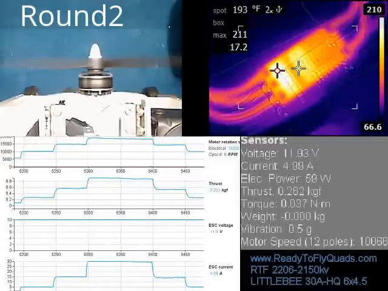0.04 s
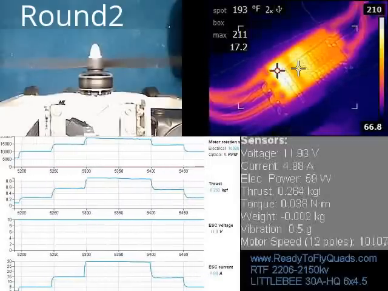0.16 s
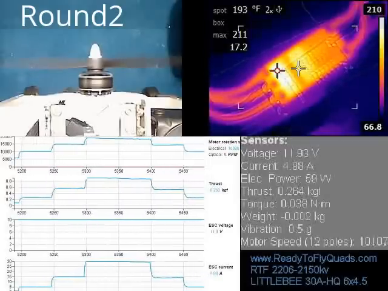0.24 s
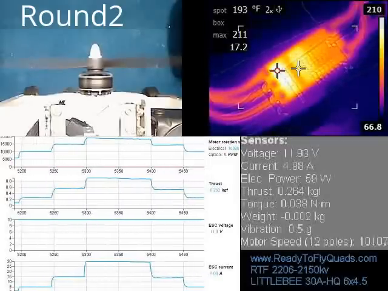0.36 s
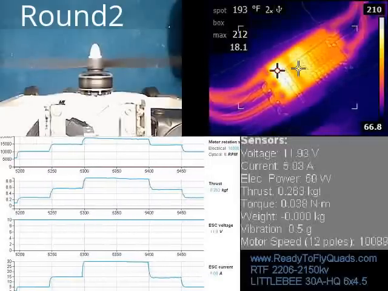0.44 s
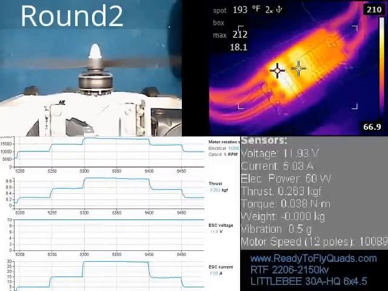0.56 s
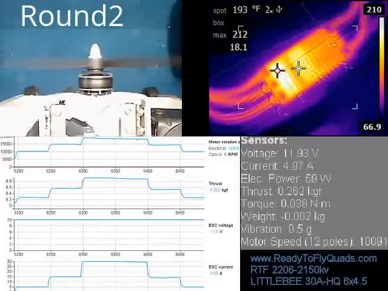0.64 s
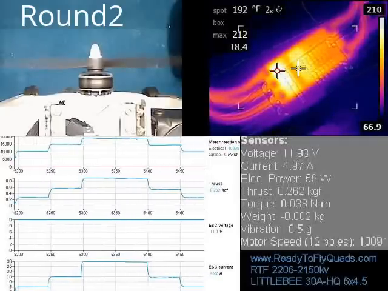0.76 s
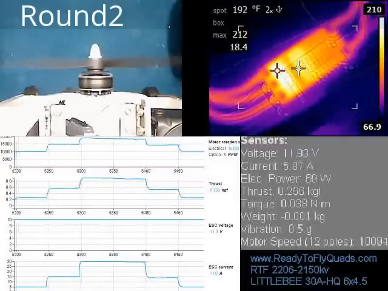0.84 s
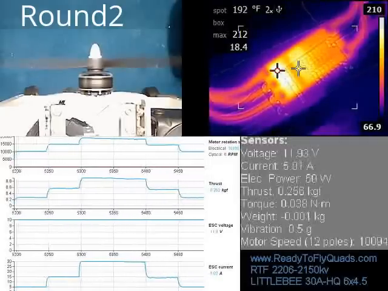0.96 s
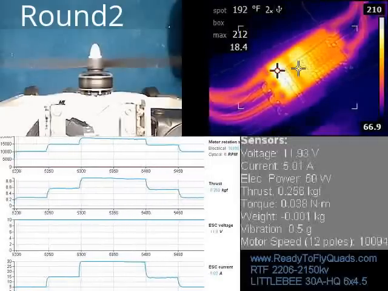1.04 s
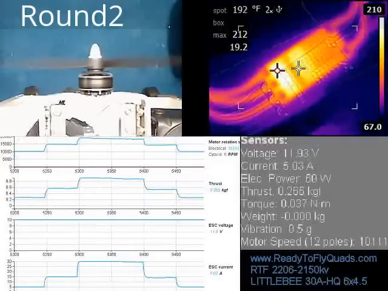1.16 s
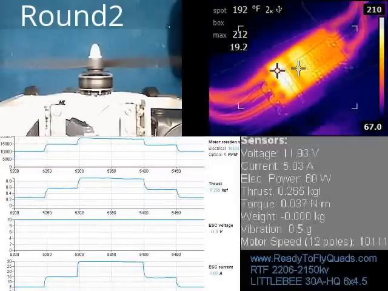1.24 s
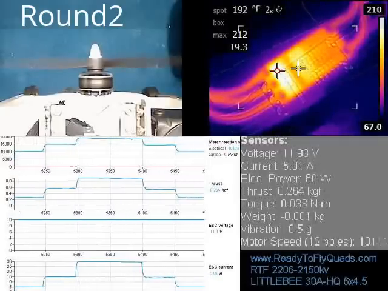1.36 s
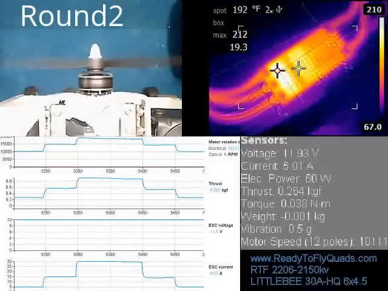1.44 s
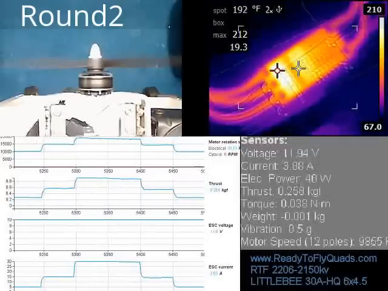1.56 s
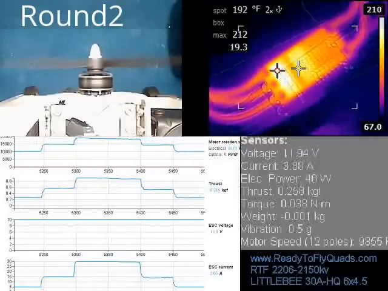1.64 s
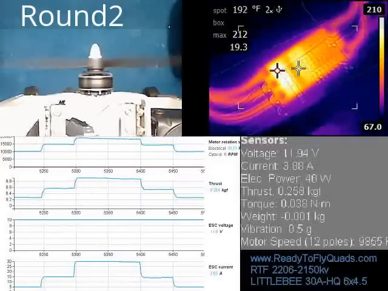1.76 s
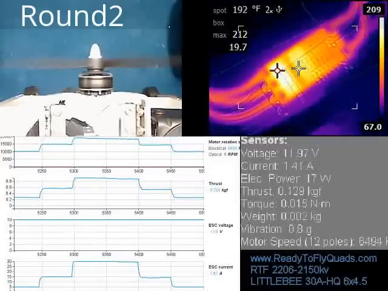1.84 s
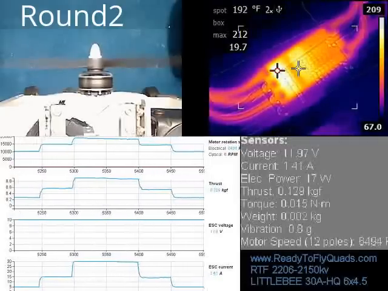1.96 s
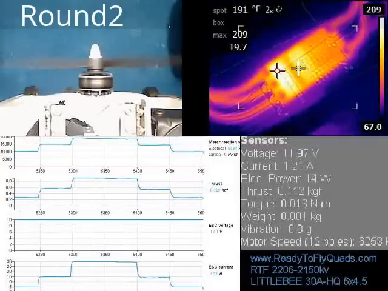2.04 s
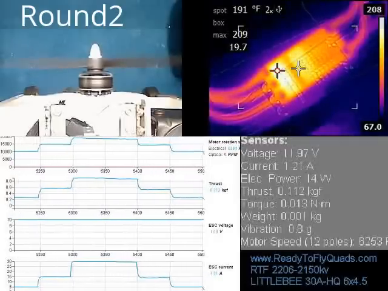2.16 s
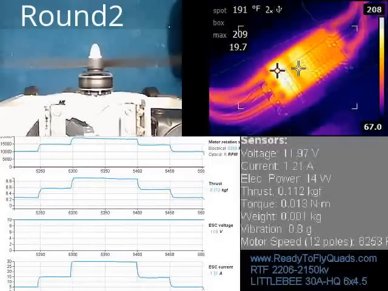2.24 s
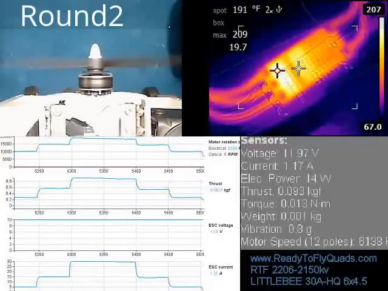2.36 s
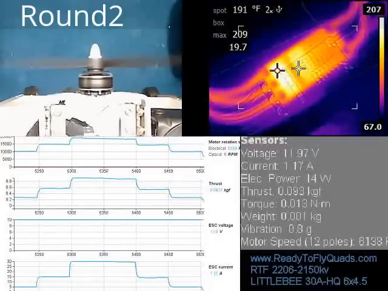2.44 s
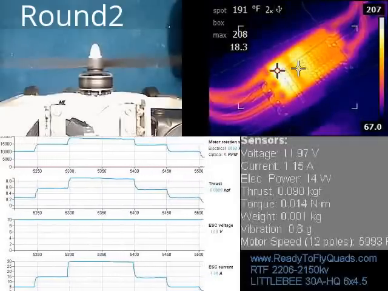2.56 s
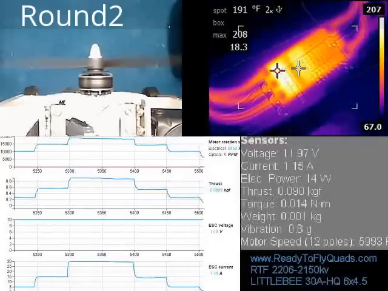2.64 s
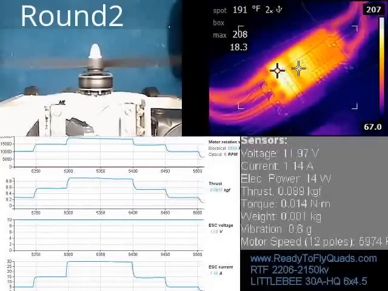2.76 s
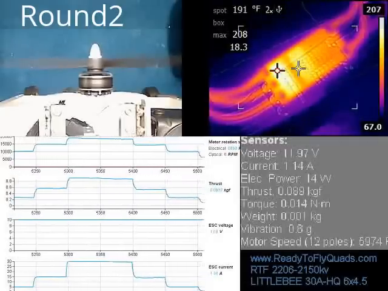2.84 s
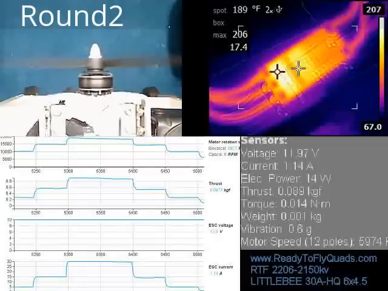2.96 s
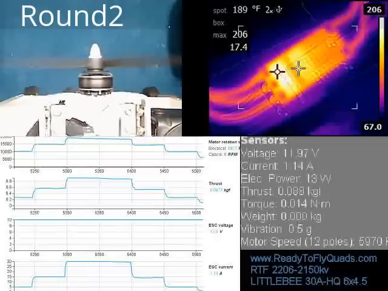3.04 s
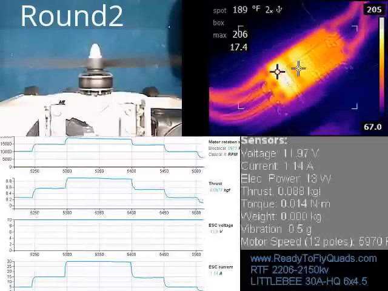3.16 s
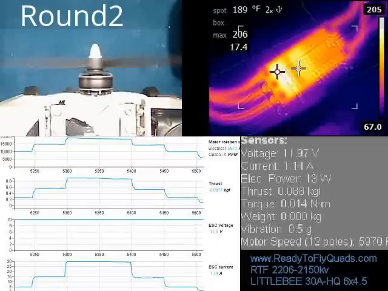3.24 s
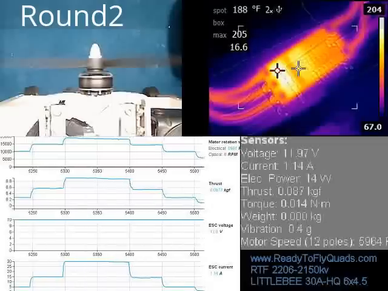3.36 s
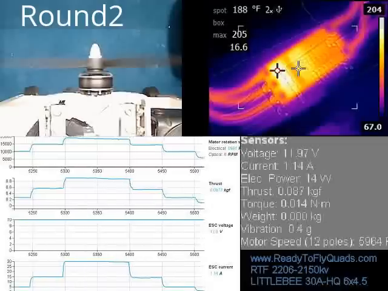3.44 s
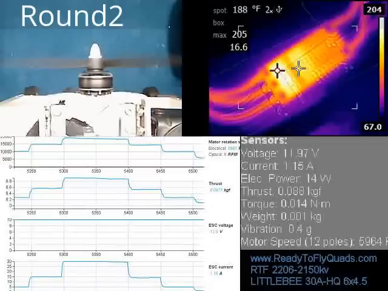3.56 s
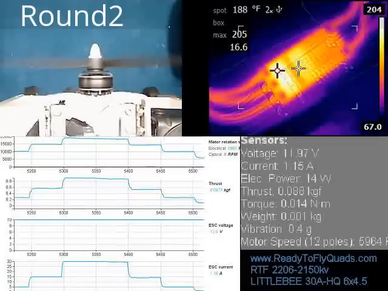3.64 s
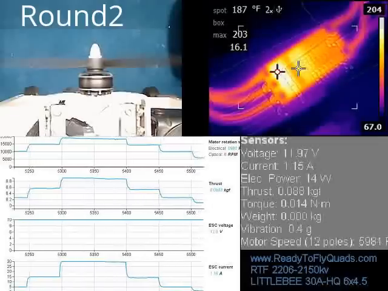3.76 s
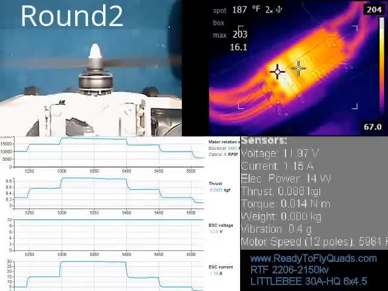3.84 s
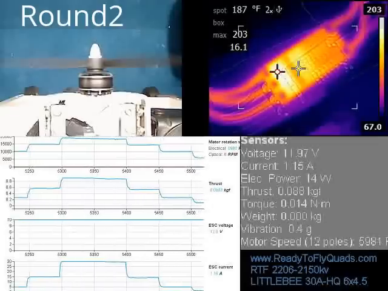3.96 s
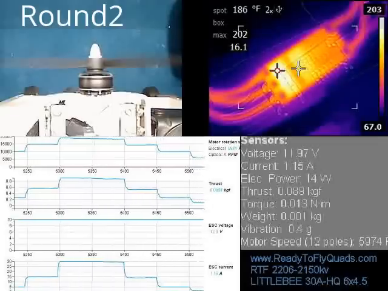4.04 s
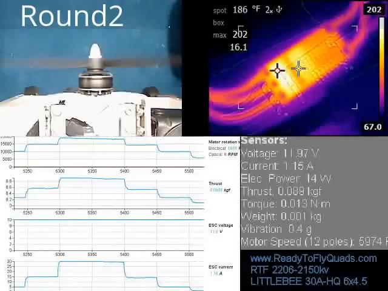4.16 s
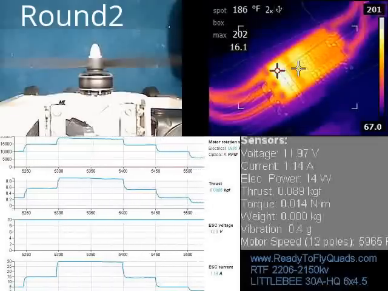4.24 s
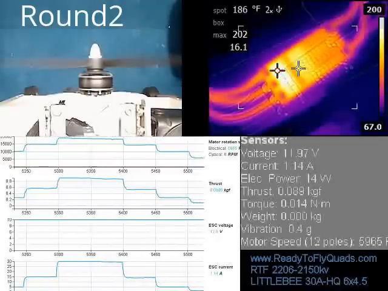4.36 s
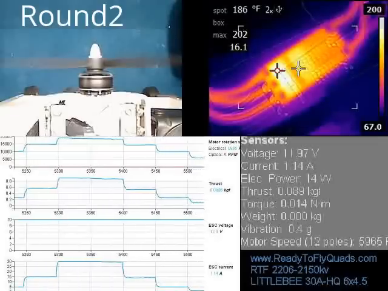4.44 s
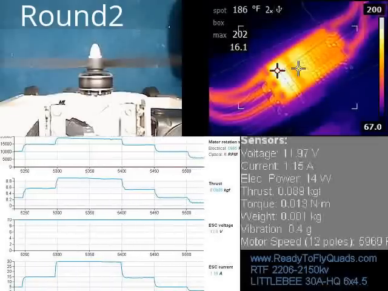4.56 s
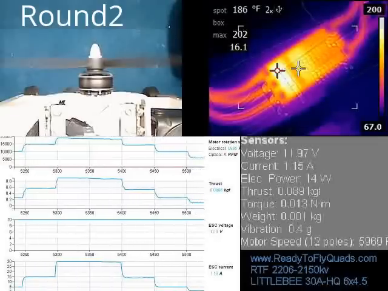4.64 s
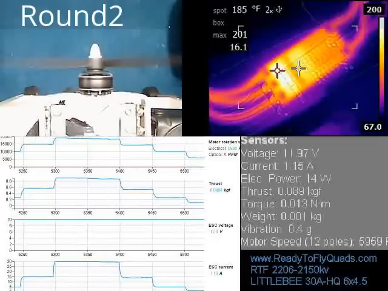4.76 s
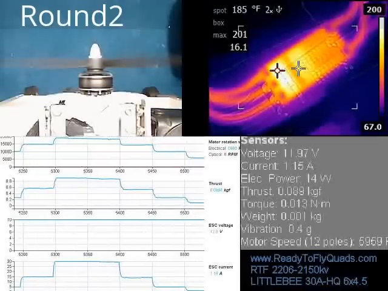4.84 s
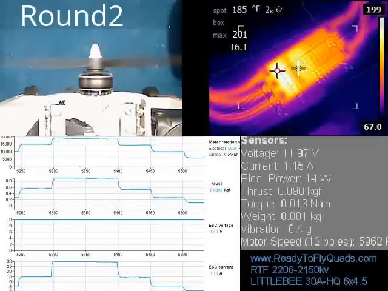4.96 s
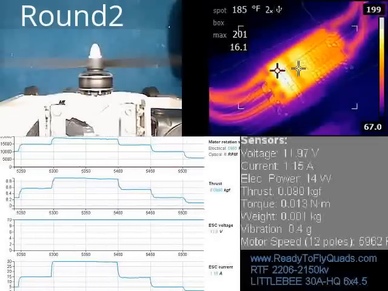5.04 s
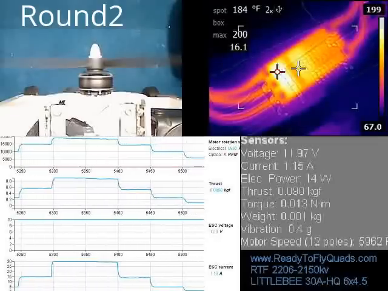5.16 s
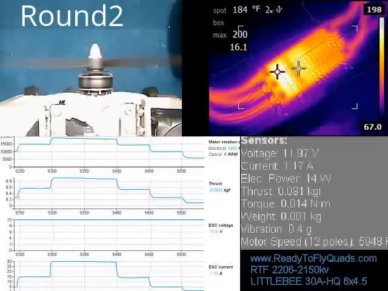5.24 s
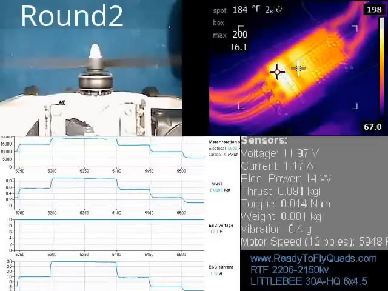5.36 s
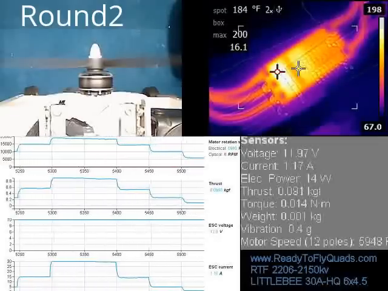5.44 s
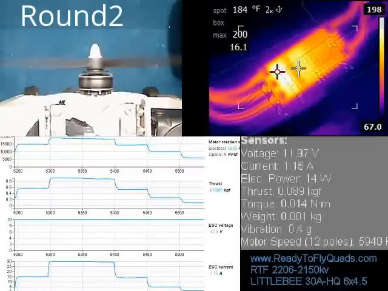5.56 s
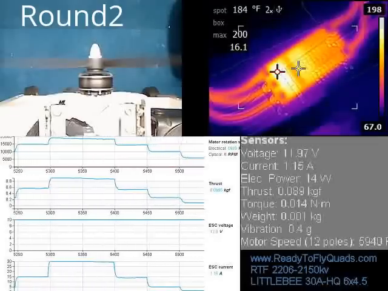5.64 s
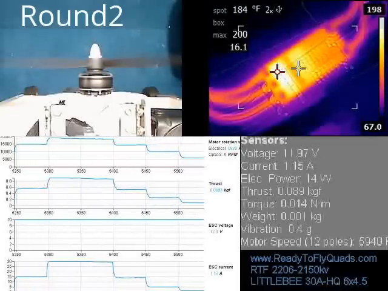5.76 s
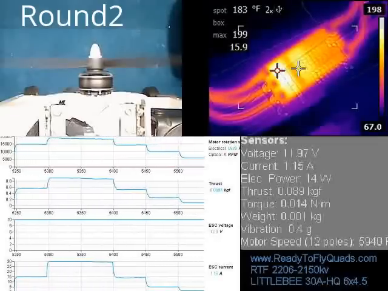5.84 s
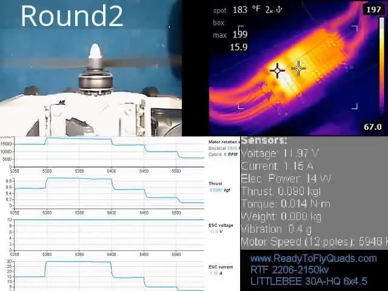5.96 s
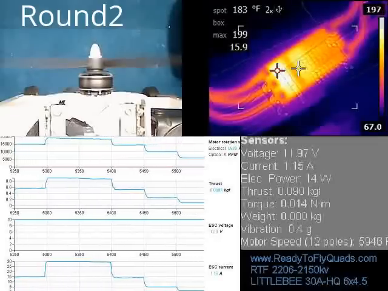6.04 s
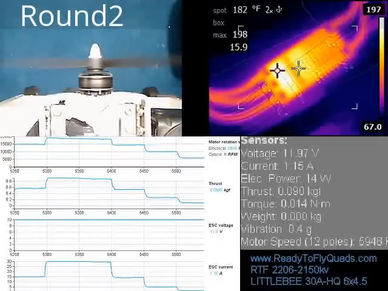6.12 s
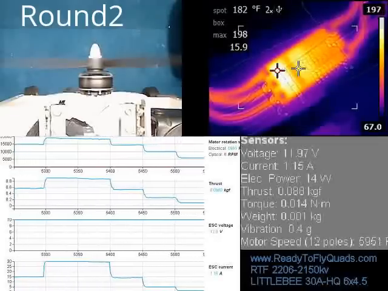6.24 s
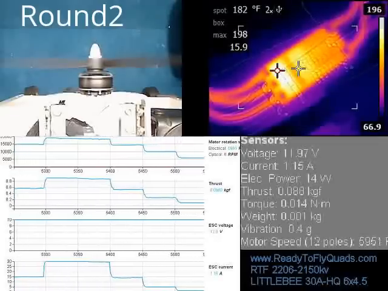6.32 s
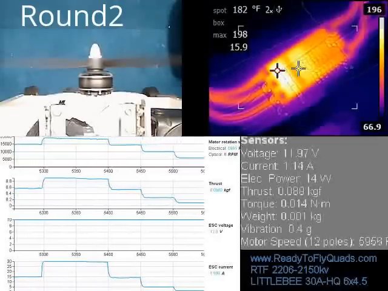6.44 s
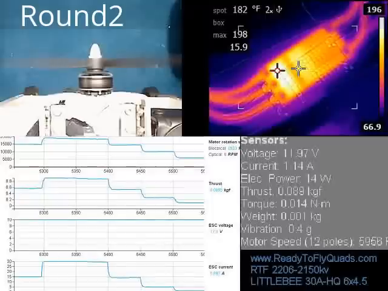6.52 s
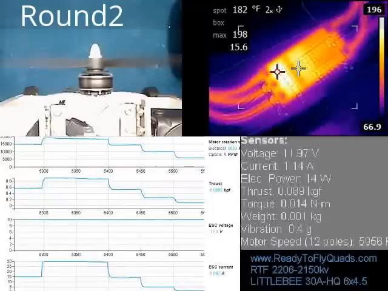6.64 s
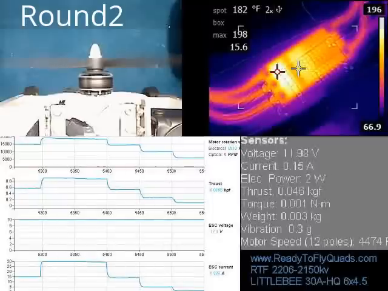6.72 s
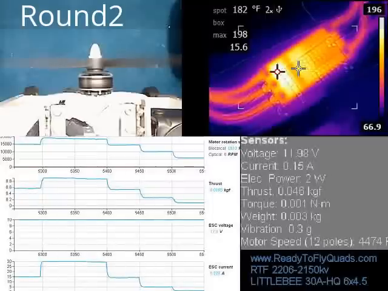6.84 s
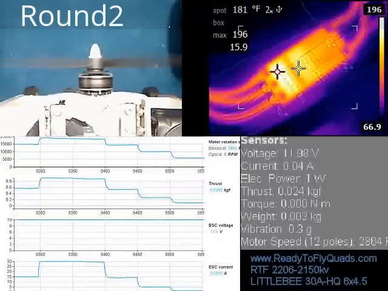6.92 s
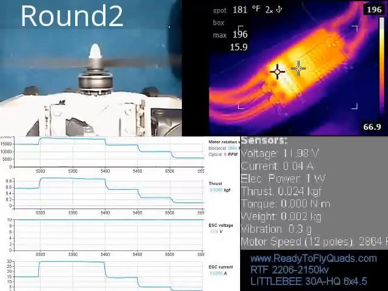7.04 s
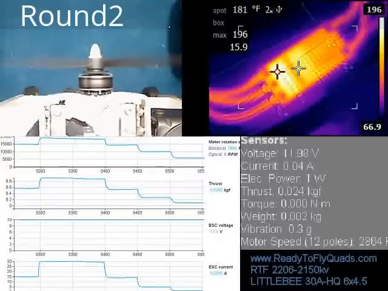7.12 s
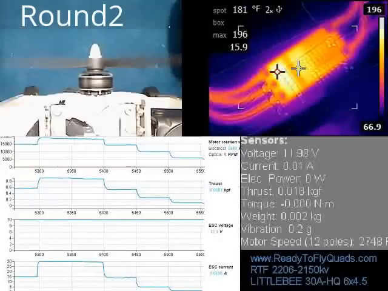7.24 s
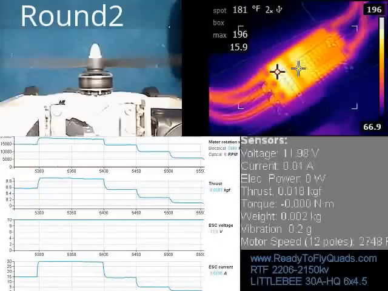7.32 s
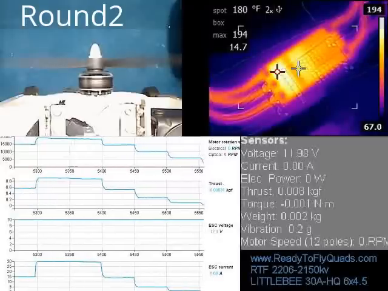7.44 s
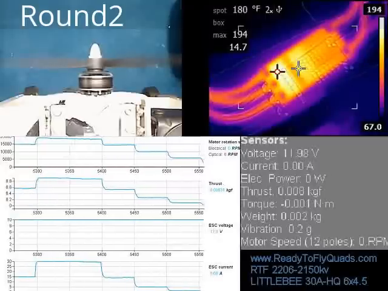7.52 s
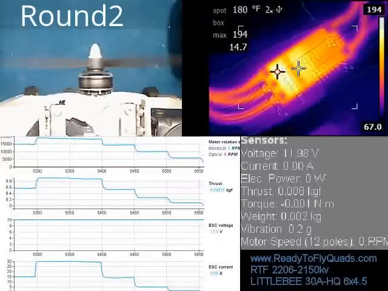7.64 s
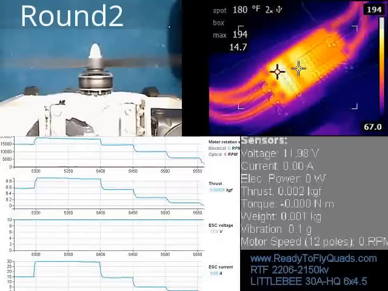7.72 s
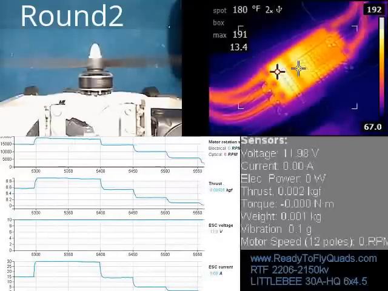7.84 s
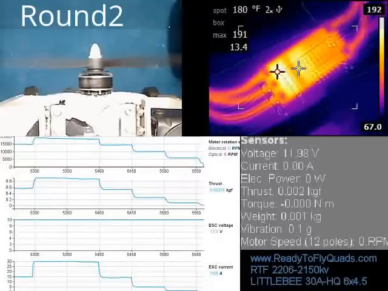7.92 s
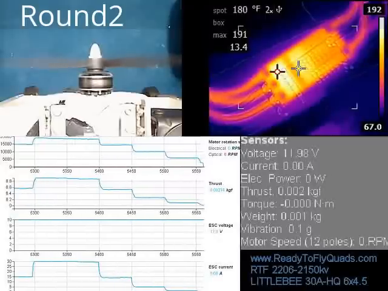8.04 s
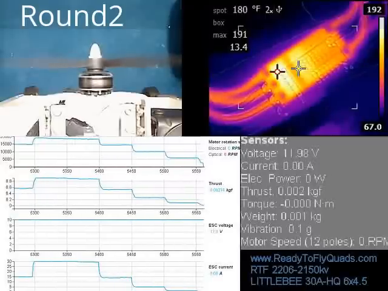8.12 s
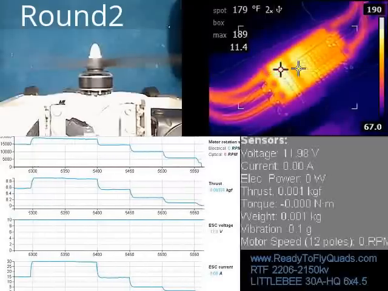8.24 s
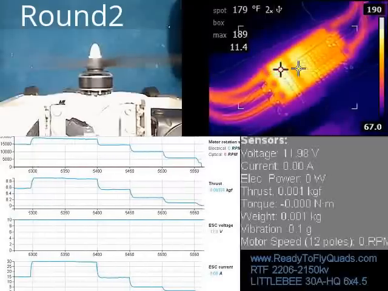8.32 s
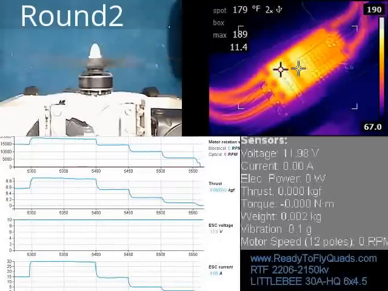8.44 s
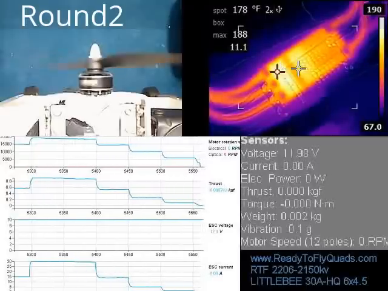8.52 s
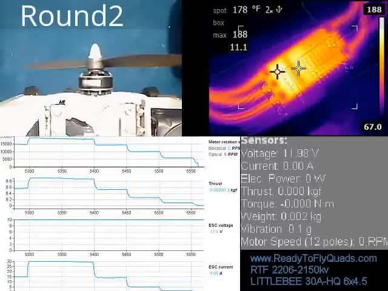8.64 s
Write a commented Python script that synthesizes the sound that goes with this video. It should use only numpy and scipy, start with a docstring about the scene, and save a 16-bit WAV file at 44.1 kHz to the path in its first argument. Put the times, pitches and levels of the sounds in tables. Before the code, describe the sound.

A small electric motor spins a propeller on a test stand, close to the microphone in a workshop. From the start there is a strong, steady buzzing drone with a hiss of rushing air and a thin high whine. At about 1.3 seconds the throttle drops: the pitch slides down over half a second, the whine dips briefly, and the stand gives a short resonant shudder. The propeller then holds a lower, quieter hum, with a softer hiss and a slightly wavering high whine. At about 6.2 seconds the power is cut and the whine stops at once. The propeller coasts, its hum sinking and fading into a soft flutter and a faint bearing whir, nearly at rest by the end at about 8.7 seconds. Dull ventilation noise with a faint hum runs underneath, and the walls add a slight, short echo.

```python
"""In a workshop, a small brushless motor turns a two-blade propeller on a thrust stand near the microphone.
The throttle steps down from about 8700 to 5100 rpm, then is cut, and the propeller coasts almost to rest.
One shaft sets every rate: the blades radiate harmonics, buzz in eddies and hiss at their trailing edges,
magnetic forces whine, and bearings, stand and rotor bell are driven into resonance.
Ventilation noise and a short echo from the walls lie underneath."""
import sys
import numpy as np
from scipy import signal
from scipy.fft import rfft, irfft
from scipy.io import wavfile

SR = 44100
rng = np.random.default_rng(int(sys.argv[2]) if len(sys.argv) > 2 else 0)


def store_pcm(level_fs):
    """Save levels as 16-bit WAV."""
    pcm = np.round(np.clip(level_fs, -1, 1) * 32767).astype(np.int16)
    wavfile.write(sys.argv[1], SR, np.atleast_2d(pcm).T)


N = 382768
TIME = np.arange(N) / SR

COAST_HZ, LOW_HZ, HIGH_HZ = 42, 85.25, 144.45  # shaft rates: partway down the coast, low and high throttle
STEP_S, CUT_S = 1.256, 6.24  # the throttle steps down, then is cut

# Slow drift of the held speed. Each row: time in seconds, offset of the shaft rate in Hz.
SPEED_DRIFT = [(.4, -.25), (1.25, .25), (2.2, .05), (4.3, -.05), (5.3, -.42), (6.2, -.1)]
# Slips of the controller's timing. Each row: centre in seconds, half length in seconds, whine dip in dB.
TIMING_SLIPS = [(1.219, 0.095, 4), (2.124, .2, 7), (3.413, 0.064, 8), (3.615, .1, 4), (4.552, 0.099, 4)]
# Pressure tones of the blades. Each row: order (multiple of the shaft rate), base level in dB at low
# throttle, power of speed by which the amplitude grows.
BLADE_HARMONICS = [(1, -37, 0.089), (2, -22, 2.6), (3, -55.5, 2.8), (5, -51.5, 0.13)]
# Octave of the blade-passing tone at high and at low throttle. Each row: time in seconds, level in dB.
OCTAVE_AT_HIGH = [(0.1, -30.5), (0.166, -27.5), (1.102, -26), (1.184, -35), (1.25, -26)]
OCTAVE_AT_LOW = [(1.7, -33), (1.91, -32.5), (3.62, -35), (3.7, -37), (4.44, -34), (4.86, -37.5),
                 (6.2, -33.5)]
# Envelope of the eddy buzz. Each row: order, base level in dB at low throttle, the same at high throttle.
BUZZ_ENVELOPE = [(5.74, -45, -43.5), (7.84, -55, -39.5), (10, -52.5, -44.5), (12.5, -52.5, -41.5),
                 (13.95, -45, -43), (15.2, -52, -39.5), (20.2, -56, -42), (22, -53.5, -37),
                 (26.1, -58.5, -40), (30, -57.5, -40), (35.3, -59, -44), (40.3, -57, -56), (50, -62, -53.5),
                 (69.5, -59.5, -75.5)]
# Trailing-edge noise. Each row: frequency in Hz, density in dB per Hz at COAST_HZ, LOW_HZ and HIGH_HZ.
RUSH_SPECTRA = [(30.5, -74, -82, -72), (70, -66.5, -77, -67.5), (196, -79.5, -82.5, -75),
                (590, -85.5, -78.5, -71.5), (1310, -88, -80, -73), (2000, -91, -77.5, -69.5),
                (2960, -90, -76, -65.5), (3670, -95.5, -73, -66.5), (4460, -96, -80.5, -66.5),
                (5240, -99.5, -80.5, -71.5), (5260, -95.5, -69.5, -65.5), (5900, -99, -81, -66.5),
                (6260, -99, -77.5, -64.5), (8100, -106, -91, -79)]
# Magnetic tones of the 14-pole rotor. Each row: order, level in dB before the throttle's offset.
MAGNET_HARMONICS = [(14, -58.5), (28, -53), (40, -57.5), (44, -49.5), (56, -49.5), (70, -43), (72, -58),
                    (78, -60.5), (80, -55.5), (84, -55), (86, -65), (88, -54.5), (90, -69)]
# Frame modes that the bearings excite. Each row: frequency in Hz, width in Hz, peak density in dB per Hz.
FRAME_MODES = [(316, 100, -76), (444, 88, -76.5), (880, 190, -86.5), (2080, 130, -93)]
# Ventilation noise. Each row: frequency in Hz, density in dB per Hz.
VENTILATION_SPECTRUM = [(25, -74.5), (45, -76), (80, -83.5), (140, -84), (200, -90.5), (320, -88),
                        (600, -96.5), (900, -95.5), (1500, -104), (3000, -108), (7000, -111), (8000, -118)]
# The room's hum and whistle. Each row: frequency in Hz, level in dB.
HUM_AND_WHISTLE = [(42, -61), (6850, -86.5)]
# Modes of the stand. Each row: driving order, frequency in Hz, width in Hz, level at resonance in dB,
# depth of shudder from 0 to 1.
STAND_MODES = [(1, 66, 18, -36, 0), (3, 322, 44, -34.5, .3), (12, 308, 26, -47, .7), (13, 312, 22, -51, .7),
               (26, 308, 34, -57, .7)]
# Mode of the rotor bell. One row: frequency in Hz, width in Hz, base level at resonance in dB.
BELL_MODE = (5570, 110, -30)
# Magnetic forces on the bell. Each row: order, level in dB relative to the mode's base level.
BELL_FORCES = [(49, -9), (56, 1.5)]


def undb(db):
    """Amplitude ratio of a level in decibels."""
    return 10 ** (np.asarray(db) / 20)


def curve(rows):
    """Linear interpolation in time between (seconds, value) rows."""
    return np.interp(TIME, *np.transpose(rows))


def walk(rate):
    """Band-limited random motion of unit spread, with `rate` independent values a second."""
    steps = signal.resample_poly(rng.standard_normal(4096), up=8, down=1)
    return np.interp(TIME * rate * 8, np.arange(len(steps)), steps)


def tone(phase, db):
    """A sinusoid of the given rms level."""
    return np.sqrt(2) * undb(db) * np.sin(phase)


def colour(white, hz, db):
    """Spectral shaping: white noise takes on a density given in dB per Hz."""
    bins = np.maximum(np.fft.rfftfreq(N, 1 / SR), 1)
    gain = undb(np.interp(np.log(bins), np.log(hz), db))
    return irfft(rfft(white) * gain * np.sqrt(SR / 2), N)


def ring(x, hz, width_hz):
    """Forced response of a damped resonator with unit gain at its centre."""
    return signal.lfilter(*signal.iirpeak(hz, hz / width_hz, fs=SR), x)


def after(start_s, release_s=0.025):
    """Linear ramp from 0 to 1 as the current answers a throttle change."""
    return np.clip((TIME - start_s) / release_s, 0, 1)


def slip_depth_db():
    """Each timing slip of the controller comes and goes as a Gaussian pulse."""
    return sum(db * np.exp(-((TIME - at) / half_s) ** 2) for at, half_s, db in TIMING_SLIPS)


def overspeed(settle_s=.145):
    """Exponential relaxation: the shaft's excess in Hz over the low setting decays after the step."""
    return (HIGH_HZ - LOW_HZ) * np.exp(-np.maximum(TIME - STEP_S, 0) / settle_s)


def freewheel_db(full_drop_db=-16.5, half_drop_hz=2.2):
    """Freewheeling: the current drops while the rotor outruns its setting."""
    excess_hz = overspeed()
    return after(STEP_S) * full_drop_db * excess_hz / (excess_hz + half_drop_hz)


def shaft_speed(drag_per_turn=.0308, friction_hz_per_s=7.2, slip_hz_per_db=.04):
    """Turns per second: held by the throttle, then slowed by quadratic air drag and constant friction."""
    driven = LOW_HZ + overspeed() + curve(SPEED_DRIFT) + slip_hz_per_db * slip_depth_db()
    balance_hz = np.sqrt(friction_hz_per_s / drag_per_turn)  # drag equals friction at this speed
    start = np.arctan(np.interp(CUT_S, TIME, driven) / balance_hz)
    coast = balance_hz * np.tan(start - drag_per_turn * balance_hz * np.maximum(TIME - CUT_S, 0))
    return np.where(TIME < CUT_S, driven, coast)


def blade_tones(speed, angle, wobble_db_per_s=-1.5, stall_hz=26.7):
    """Periodic loading: two blades radiate the even orders, and their slight mismatch the odd ones."""
    coast_db = 20 * np.log10(np.minimum(speed / LOW_HZ, 1))
    octave_db = curve([*OCTAVE_AT_HIGH, *OCTAVE_AT_LOW]) + 2.8 * coast_db + 0.44 * walk(15)
    out = tone(4 * angle + np.pi / 2, octave_db)
    for order, db, power in BLADE_HARMONICS:
        db = db + power * 20 * np.log10(speed / LOW_HZ)
        if order == 1:  # the once-a-turn wobble eases with time and when the load drops
            db = db + wobble_db_per_s * TIME + 0.61 * freewheel_db()
        if order % 2:
            db = db + 1.5 * walk(6.6) + 2 * coast_db
        out = out + tone(order * angle + np.pi / 2, db)  # crests line up as a blade passes
    return out / (1 + (stall_hz / speed) ** 4)  # slow blades carry no lift


def blade_puffs(speed, angle, db=-44.5, knee_hz=28.):
    """Displacement: even a coasting blade pushes a soft puff of air aside on every pass."""
    puffs = np.cos(2 * angle) + 0.12 * np.cos(4 * angle)
    return undb(db) * np.sqrt(2) * puffs * np.tanh(speed / knee_hz) ** 2


def eddy_buzz(speed, angle, eddy_rate=9., steady=0.34, odd_db=-15.0, coast_power=2.25):
    """Turbulent loading: blades chop eddies, so each harmonic wanders in amplitude and phase."""
    orders, low_db, high_db = np.transpose(BUZZ_ENVELOPE)
    throttle = np.clip(np.log(speed / LOW_HZ) / np.log(HIGH_HZ / LOW_HZ), 0, 1)
    out = 0
    for order in [*range(6, 72, 2), *range(7, 25, 2)]:
        low, high = np.interp(order, orders, low_db), np.interp(order, orders, high_db)
        rate = eddy_rate if order % 2 else eddy_rate + 1.1 * order  # small eddies are short-lived
        phase = order * angle + rng.uniform(0, 2 * np.pi)
        harmonic = (steady + walk(rate)) * np.cos(phase) + walk(rate) * np.sin(phase)
        out = out + harmonic * undb(low + throttle * (high - low) + odd_db * (order % 2))
    out = out + 0.63 * ring(out, hz=895.0, width_hz=110)  # the frame rings under the downwash
    return out * np.minimum(speed / LOW_HZ, 1) ** coast_power / np.sqrt(1 + steady ** 2 / 2)


def air_rush(speed, angle, power=2.73, throb=0.11, gust_db=0.75):
    """Trailing-edge noise grows as a power of speed, brightens, and pulses as each blade swings past."""
    hz, *spectra = np.transpose(RUSH_SPECTRA)
    settings = [COAST_HZ, LOW_HZ, HIGH_HZ]
    white = rng.standard_normal(N) * (1 + throb * np.cos(2 * angle)) * undb(gust_db * walk(20))
    out = 0
    for setting, db, pick in zip(settings, spectra, np.eye(len(settings))):
        crossfade = np.interp(speed, settings, pick)
        out = out + crossfade * (speed / setting) ** power * colour(white, hz, db)
    return out


def motor_whine(angle, switchings_per_turn=42, jitter_rad=0.42):
    """Magnetic force: switched coils pull on the magnets, so the tones sink and end with the current."""
    stepped_down, current_db = after(STEP_S), freewheel_db()
    whine_db = np.interp(stepped_down, [0, 1], [-28, -39]) + current_db - slip_depth_db()
    whine_db = whine_db + 0.17 * walk(8) + .5 * walk(60)  # slow waver, fast flutter
    magnet_db = np.interp(stepped_down, [0, 1], [-6, -2.5]) + current_db
    out = tone(switchings_per_turn * angle, whine_db)
    for order, db in MAGNET_HARMONICS:
        phase = order * angle + jitter_rad * walk(70)
        out = out + tone(phase, db + magnet_db - 0.5 * walk(35))
    return out * (1 - after(CUT_S)) ** 2


def bearings(speed, angle, knee_hz=21.8, scuff=0.27):
    """Broadband excitation: rolling balls rub the frame's modes, fading as the rotor nears rest."""
    contact = (1 + scuff * np.cos(angle)) * np.tanh(speed / knee_hz) ** 2  # uneven over each turn
    rub = rng.standard_normal(N) * np.sqrt(SR / 2) * contact
    return sum(undb(db) * ring(ring(rub, hz, width), hz, width) for hz, width, db in FRAME_MODES)


def ventilation():
    """Ambient noise: a dull flow of air with a low hum and a thin whistle, each wavering in level."""
    air = colour(rng.standard_normal(N), *np.transpose(VENTILATION_SPECTRUM)) * undb(.7 * walk(5.4))
    return air + sum(tone(2 * np.pi * hz * TIME, db + 2 * walk(8.4)) for hz, db in HUM_AND_WHISTLE)


def wall_echo(x, t60_s=.3, gap_s=.004, wet_db=-11.5):
    """Reverberation: diffuse reflections from bench and walls decay exponentially."""
    age = TIME[:SR // 2]
    tail = rng.standard_normal(len(age)) * undb(-60 * age / t60_s) * (age > gap_s)
    return undb(wet_db) * signal.fftconvolve(x, tail / np.linalg.norm(tail))[:N]


def bell_chirps(angle, flutter_db=4.0):
    """Swept resonance: the rotor bell chirps as a falling magnetic order passes through its mode."""
    hz, width_hz, base_db = BELL_MODE
    pull = sum(tone(order * angle, base_db + db + flutter_db * walk(60)) for order, db in BELL_FORCES)
    return ring(ring(pull, hz, width_hz), hz, 10 * width_hz)


def stand_shudder(angle):
    """Forced vibration: unbalance and cogging slide through the stand's modes, which ring on briefly."""
    out = 0
    for order, hz, width_hz, db, shudder in STAND_MODES:
        shake = tone(order * angle, db) * (1 + shudder * walk(60))
        out = out + ring(ring(shake, hz, width_hz), hz, width_hz)
    return out


def scene(hunt=0.00027, turbulence_db=0.62):
    """Superposition: the sources locked to the one shaft add to the sound of the room."""
    speed = shaft_speed() * (1 + hunt * walk(25))  # the controller hunts around each speed
    angle = 2 * np.pi * np.cumsum(speed) / SR
    air = eddy_buzz(speed, angle) + air_rush(speed, angle)
    air = air * undb(turbulence_db * walk(2.3))  # turbulent inflow
    bright = air + motor_whine(angle) + bell_chirps(angle)
    propeller = blade_tones(speed, angle) + blade_puffs(speed, angle)
    body = propeller + stand_shudder(angle) + bearings(speed, angle)
    return (body + bright + wall_echo(bright) + ventilation())[None]


def record(dry):
    """Band limiting: a narrow-band microphone cuts steeply above 7700 Hz."""
    return signal.sosfilt(signal.cheby1(12, .1, 7700, fs=SR, output="sos"), dry)


dry = scene()
out = record(dry)
store_pcm(out)
```